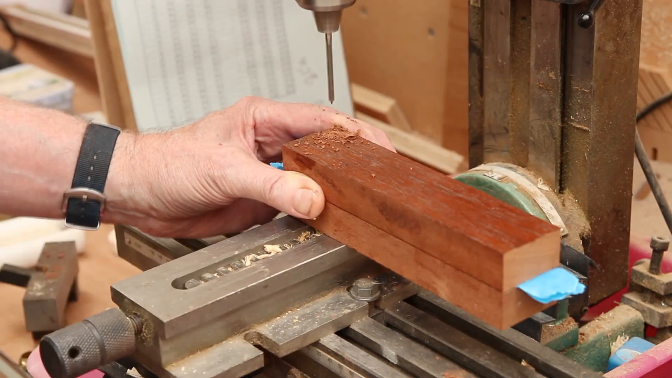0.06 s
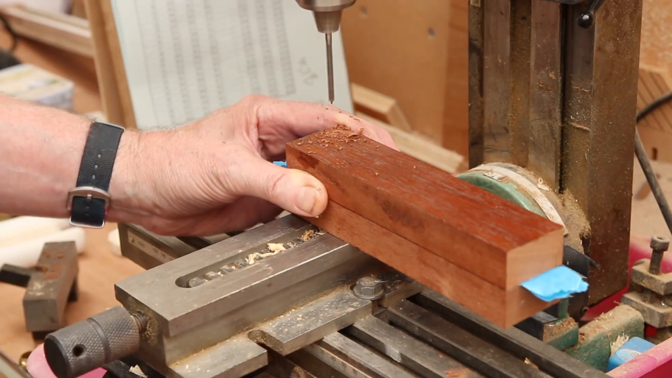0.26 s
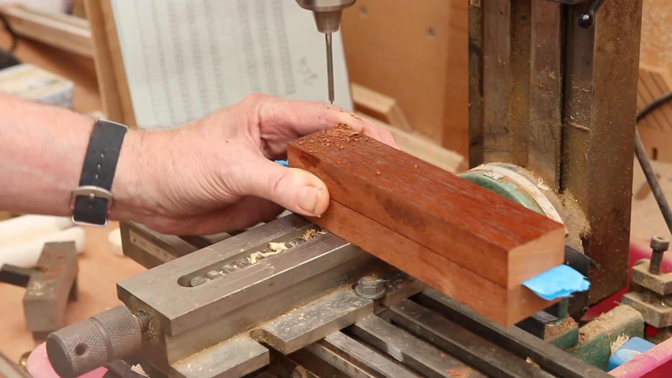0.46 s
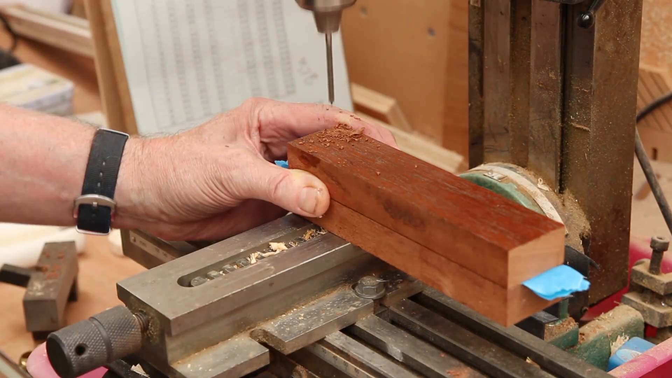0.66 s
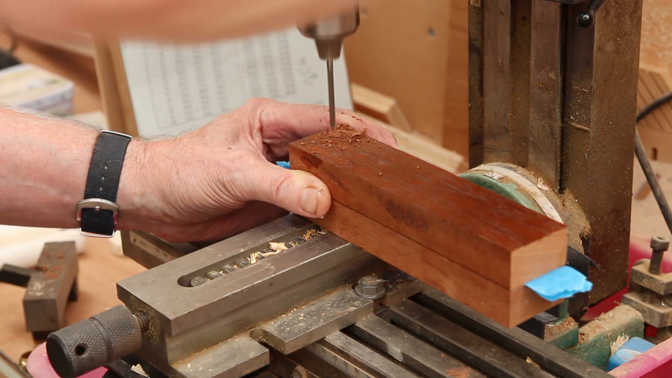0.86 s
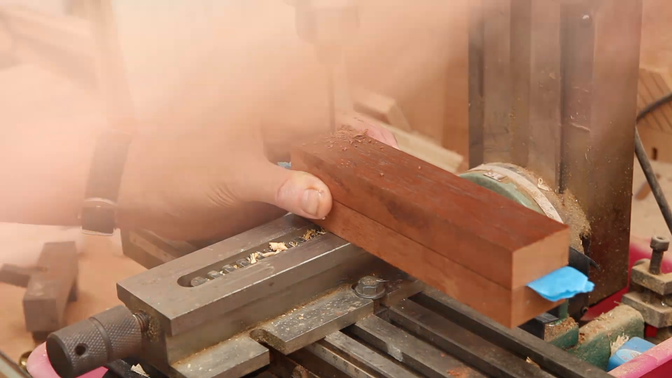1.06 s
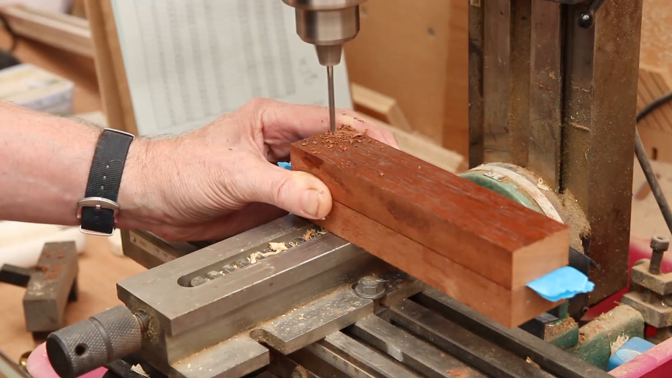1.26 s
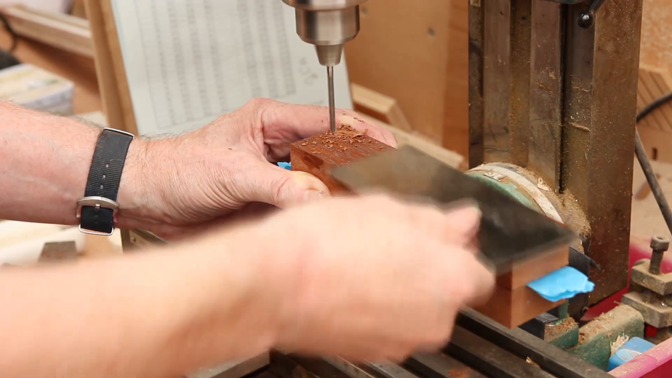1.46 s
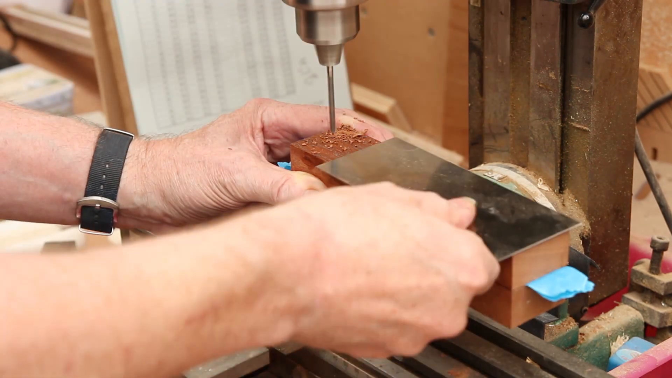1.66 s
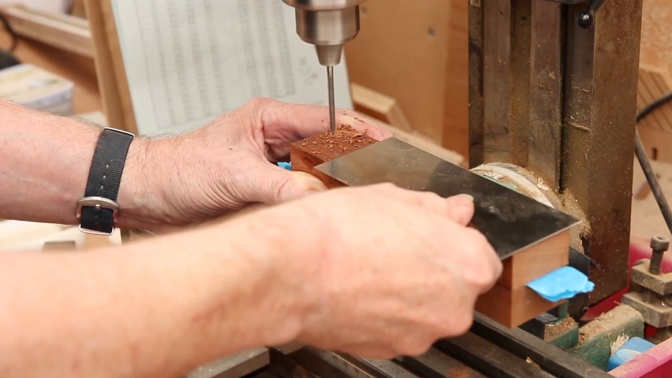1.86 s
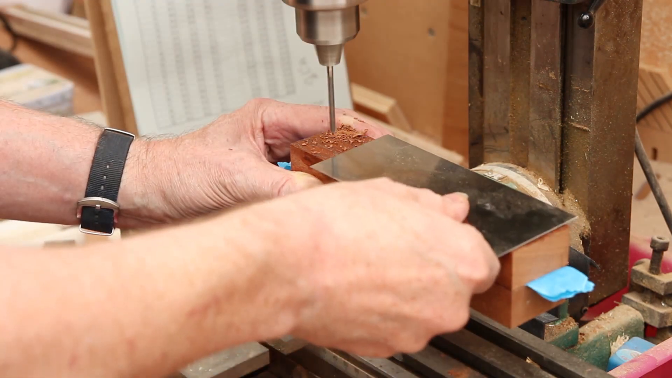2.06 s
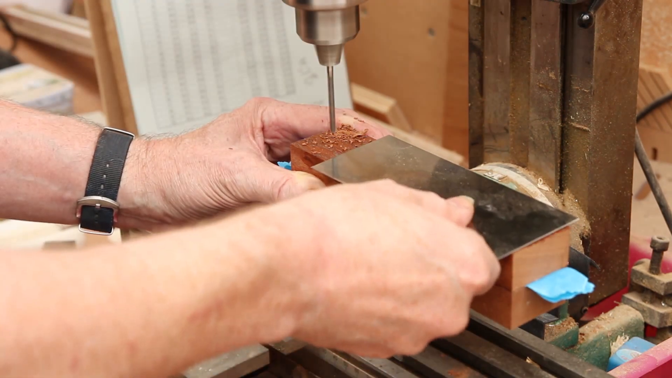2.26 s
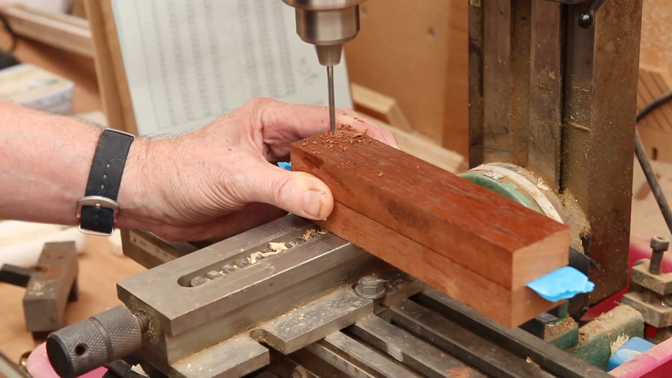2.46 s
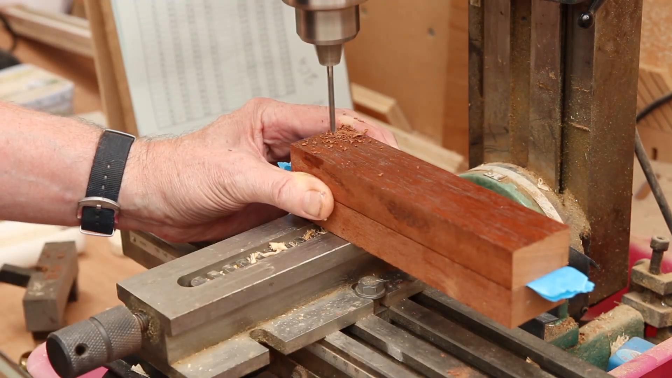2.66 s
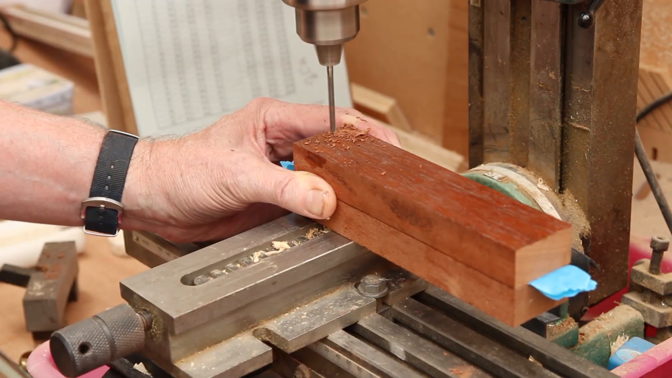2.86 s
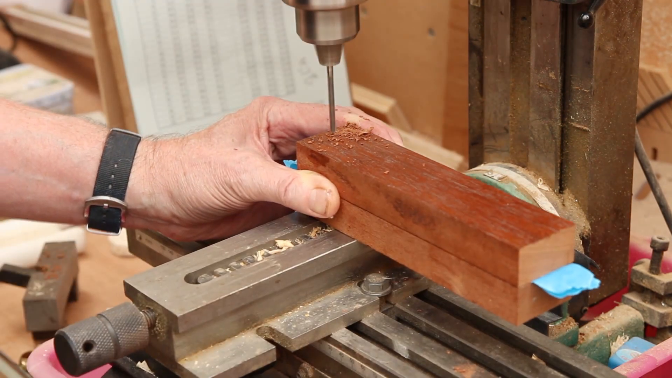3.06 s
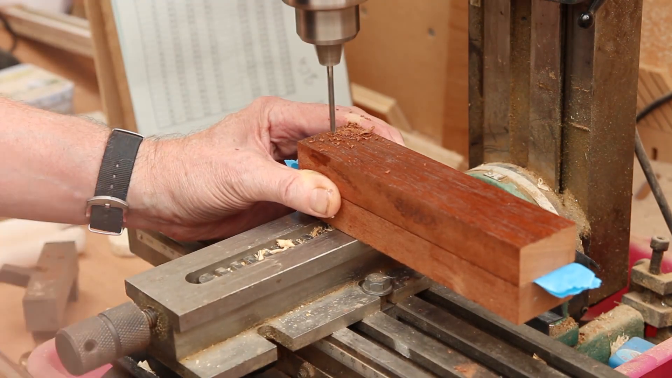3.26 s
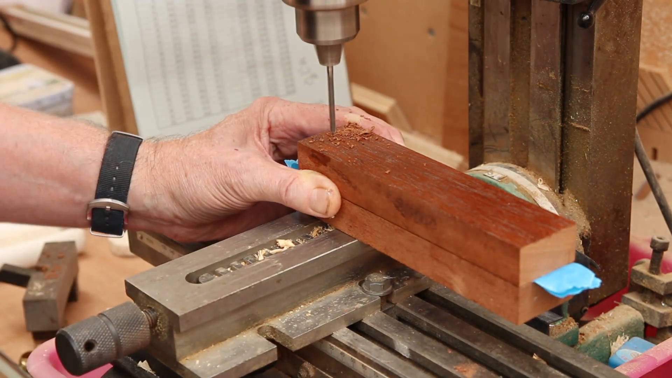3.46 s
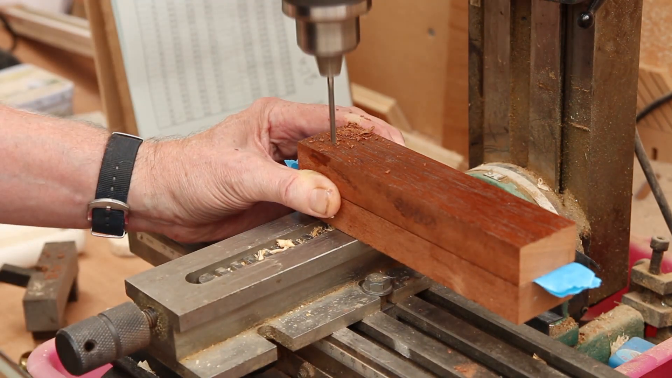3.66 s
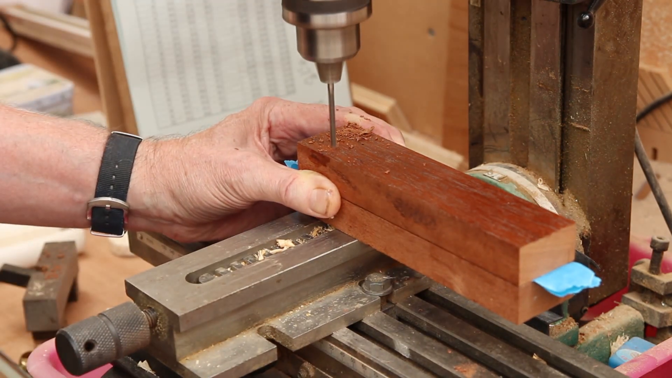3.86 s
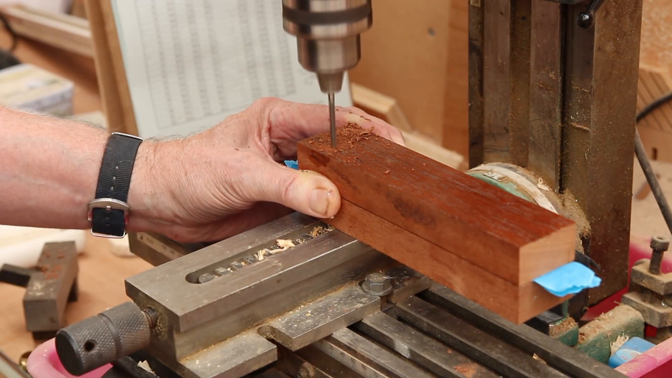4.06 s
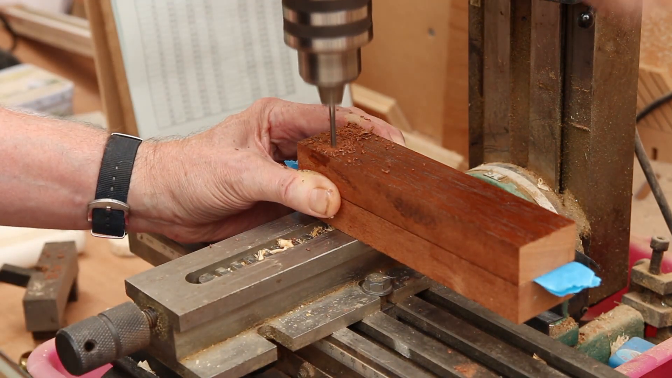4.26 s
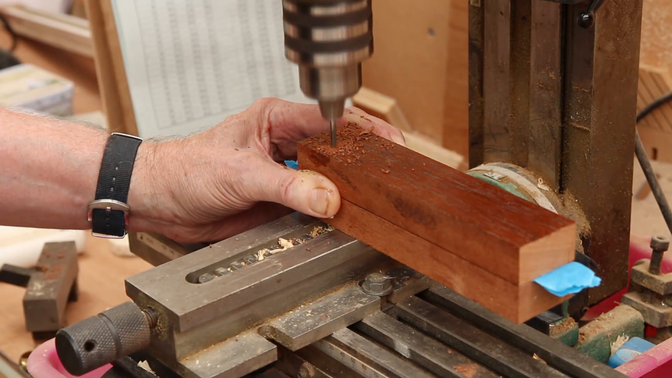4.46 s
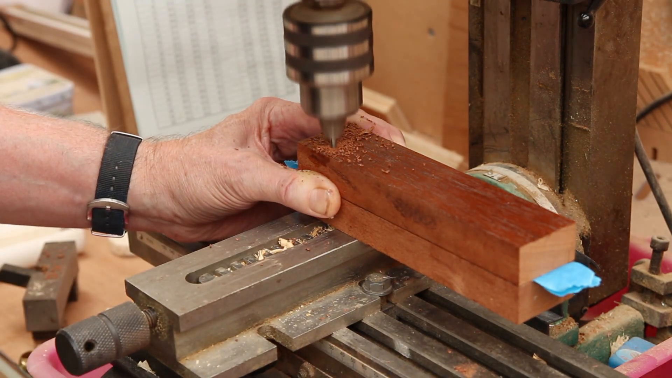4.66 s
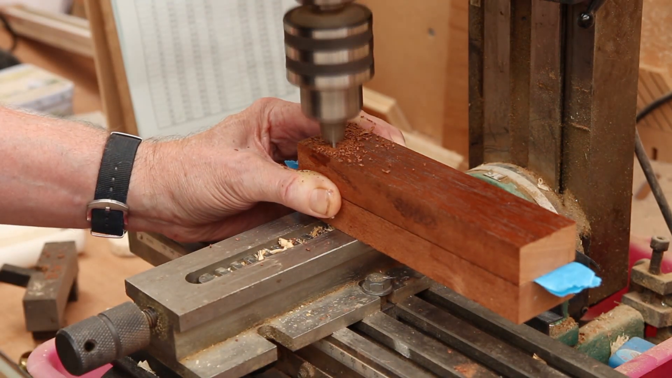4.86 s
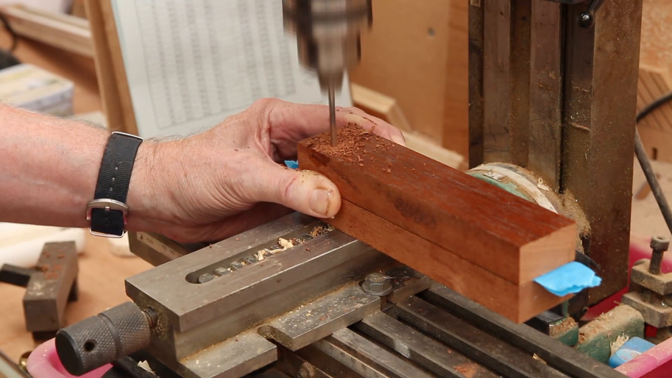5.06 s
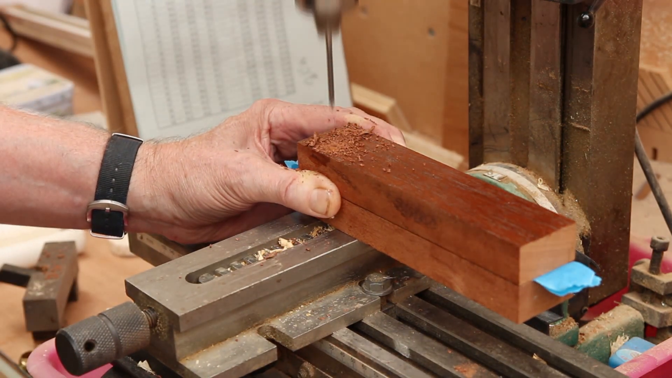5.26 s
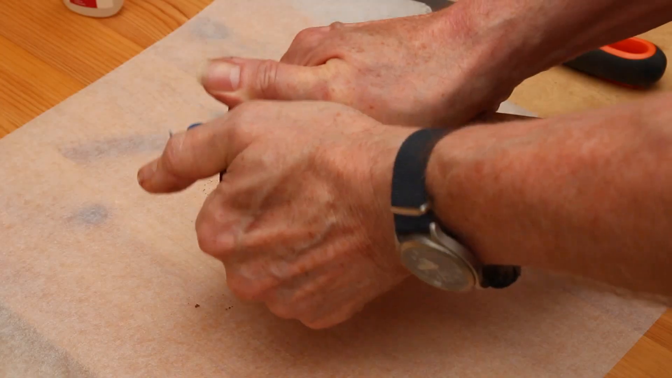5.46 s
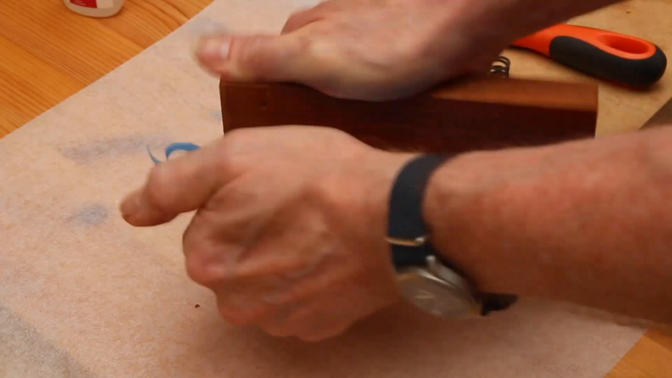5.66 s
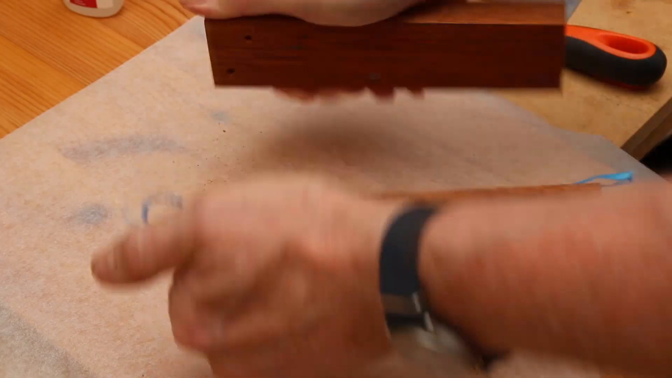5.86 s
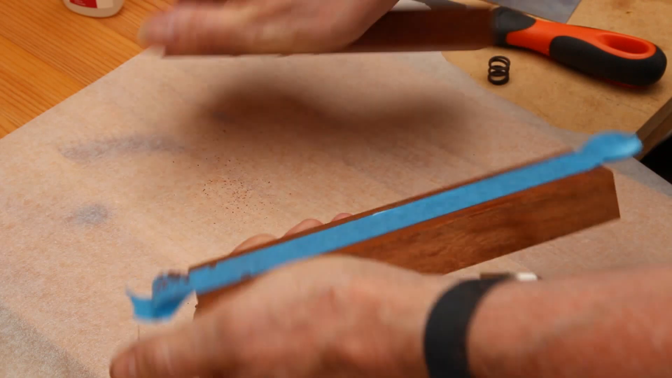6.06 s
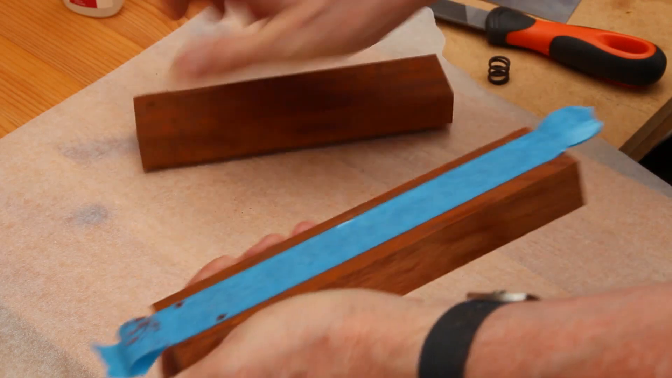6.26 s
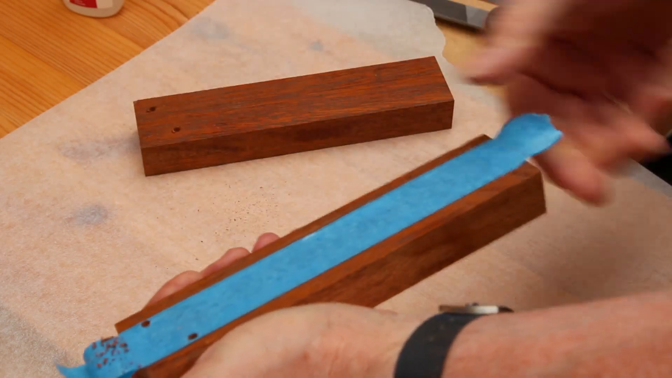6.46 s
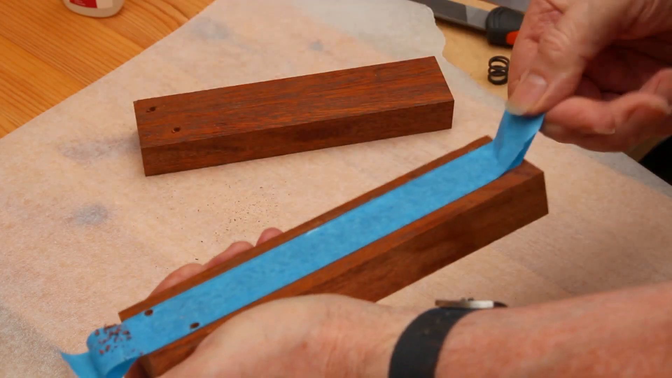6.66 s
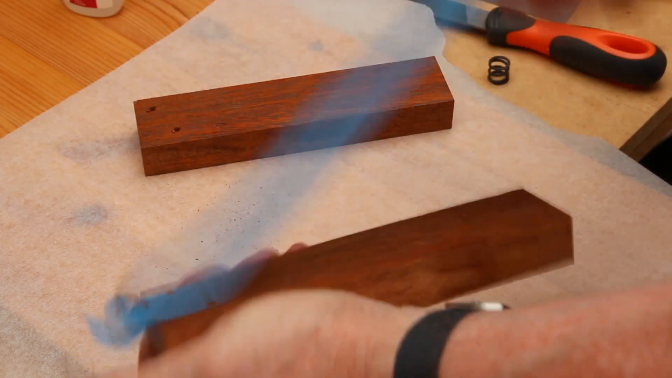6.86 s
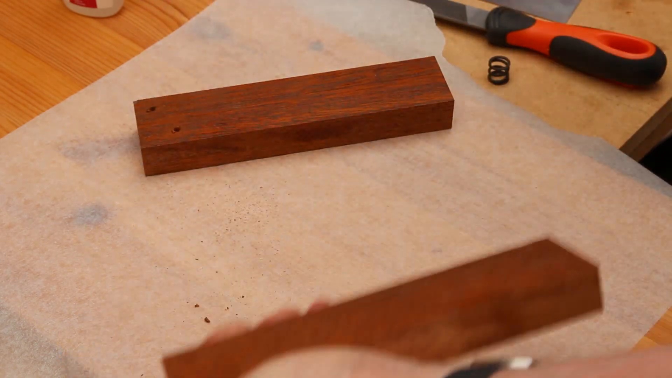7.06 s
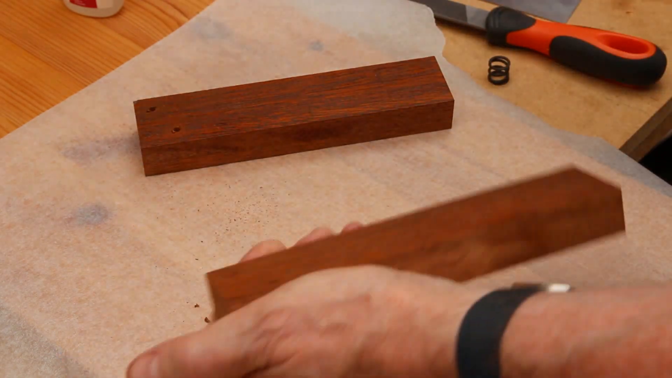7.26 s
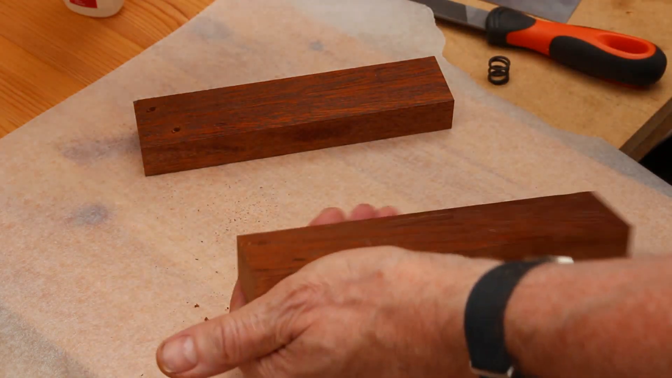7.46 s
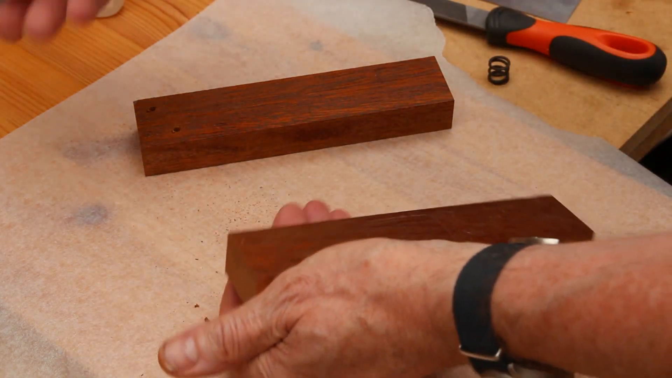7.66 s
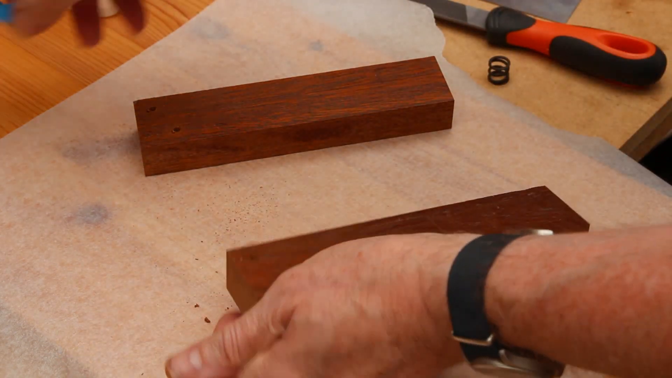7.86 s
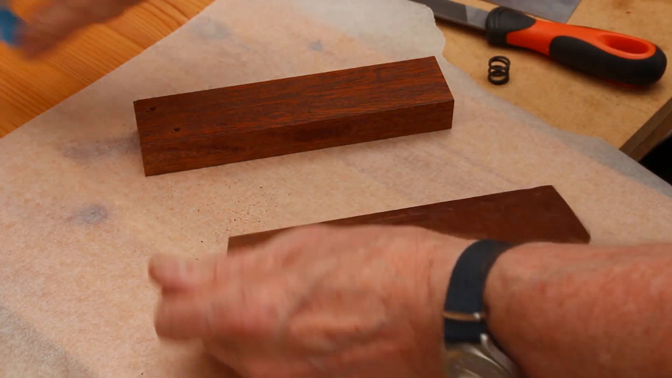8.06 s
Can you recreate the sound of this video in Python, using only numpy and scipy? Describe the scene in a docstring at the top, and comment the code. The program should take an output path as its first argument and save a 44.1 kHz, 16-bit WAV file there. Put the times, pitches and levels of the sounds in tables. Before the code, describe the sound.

A benchtop drill runs from the start, bright, metallic and pulsing, with faint scuffs and one short sagging squeak. Feeding into hardwood chokes its singing whine into denser, grittier rasp and a brief screech. It ends instantly. Then close bench sounds in a quiet, softly echoing room: a dry crack, a wood clatter, a short tape rip, light skin rubs and a dull thud, sitting slightly right in stereo.

```python
"""A small drill press chatters and whines as its bit is fed into hardwood: pulsing friction noise rings steel modes
over rasp, frame noise and hum. A steel scraper squeaks on the wood (sagging sine), among brief scuffs (narrow noise).
The drilling ends abruptly and the workbench is heard: two taped blocks snap apart (decaying noise), one is set
down with a clatter (struck modes), the tape is ripped off and the other block is turned in the hand (grainy noise)
in a quiet workshop with diffuse echoes."""
import sys
import numpy as np
from scipy import signal
from scipy.fft import rfft, irfft
from scipy.io import wavfile

SR = 44100
rng = np.random.default_rng(int(sys.argv[2]) if len(sys.argv) > 2 else 0)


def dump(signal):
    """Clip the signal to [-1, 1] and save it as 16-bit WAV at the path in sys.argv[1]."""
    limited = np.clip(np.atleast_2d(signal).T, -1, 1)
    pcm = np.round(limited * 32767).astype(np.int16)
    wavfile.write(sys.argv[1], SR, pcm)


N = 357210
TIME = np.arange(N) / SR
FREQS = np.fft.rfftfreq(N, 1 / SR)


def from_db(db):
    """Decibels to amplitude gain."""
    return 10 ** (np.asarray(db) / 20)


def rms_one(x):
    """Scale to unit power."""
    return x / np.sqrt(np.mean(x ** 2) + 1e-20)


def at_hz(points, hz):
    """Interpolate (frequency [Hz], value) points on a log-frequency axis."""
    points_hz, values = np.array(points).T[:2]
    return np.interp(np.log(np.maximum(hz, 1)), np.log(points_hz), values)


def drift(rate_hz):
    """Low-passed noise with spread 1: slow random wandering."""
    spectrum = rfft(rng.standard_normal(N))
    return rms_one(irfft(spectrum / (1 + (FREQS / rate_hz) ** 2), N))


def hump(s, length_s):
    """Gaussian of height 1 centred on s, down to exp(-2) at length_s either side."""
    return np.exp(-2 * ((TIME - s) / length_s) ** 2)


def colour(x, spectrum):
    """Minimum-phase filter of unit mean power, shaped by (frequency [Hz], relative level [dB])."""
    gain = rms_one(from_db(at_hz(spectrum, FREQS)))
    cepstrum = irfft(np.log(gain), N)
    # fold the cepstrum to make the filter causal
    cepstrum[1:N // 2] *= 2
    cepstrum[N // 2 + 1:] = 0
    return irfft(rfft(x) * np.exp(rfft(cepstrum)), N)


def stereo_noise():
    """White noise common to both ears plus a weaker side part of opposite sign in each."""
    # side signal: (frequency [Hz], level [dB])
    side_width = [(50, -11), (300, -14), (1000, -11), (3000, -13), (6000, -9), (14000, -10)]
    side = irfft(rfft(rng.standard_normal(N)) * from_db(at_hz(side_width, FREQS)), N)
    return rng.standard_normal(N) + side * [[1], [-1]]


def pan(x, right_db):
    """Raise the right channel over the left by right_db."""
    return x * from_db(np.array([[-.5], [.5]]) * right_db)


def resonate(x, hz, width_hz):
    """Two-pole resonance with peak gain 1."""
    r = np.exp(-np.pi * width_hz / SR)
    zeros = np.array([1, 0, -1]) * (1 - r * r) / 2
    poles = [1, -2 * r * np.cos(2 * np.pi * hz / SR), r * r]
    return signal.lfilter(zeros, poles, x)


def narrow(x, hz, width_hz):
    """Twice through one resonance, at unit power."""
    once = resonate(x, hz, width_hz)
    return rms_one(resonate(once, hz, width_hz))


def drill():
    """Grainy friction, pulsing with the chatter, rings the spindle and the bit over a humming motor."""
    # bit touches the wood, idles in the hole, is fed in deep, drawn back: (time [s], load on the bit [0-1])
    load_curve = [(.68, .2), (.9, .62), (1.2, .27), (2.8, .12), (3.45, .25), (4.0, .95), (4.7, .9),
                  (5.0, .5), (5.36, .55)]
    # spindle and chuck resonances:
    # (frequency [Hz], width [Hz], relative level running light [dB], relative level at full load [dB])
    whine_modes = [(2473, 19.6, -10, -6.5), (2814, 32, -5, -8), (2888, 7.4, 7, -17), (2950, 8.1, -19, 3),
                   (3016, 42, -9.5, -4), (3147, 21, -1.5, -0.5), (3209, 44, -9.5, 1.5), (3370, 24, -20, -3)]
    # bit and steel fittings:
    # (frequency [Hz], width [Hz], relative level running light [dB], relative level at full load [dB])
    steel_modes = [(5480, 68, -3.5, -8), (6043, 53, -2, -5), (6820, 72, 1.5, 5.5), (7080, 37, -8, 1),
                   (7820, 15, -17, 9.5), (9295, 290, -8.5, -3.5), (9535, 103, -4.5, 5),
                   (13470, 230, -1, 1.5), (14300, 610, -20, -6)]
    # cutting noise: (frequency [Hz], relative level [dB])
    rasp_colour = [(900, -39), (1500, -24), (2200, -7), (3400, 0.5), (3850, 3), (4600, 0.5), (5200, 5.5),
                   (6400, 3), (8800, 5), (10200, 1.5), (11200, 7.5), (12700, 1.5), (15700, 0.5)]
    let_up_s, let_up_length_s = 4.95, 0.08

    load = np.interp(TIME, *np.transpose(load_curve))
    # handle let up: frame and rasp grow quieter
    let_up = np.clip((TIME - let_up_s) / let_up_length_s, 0, 1)

    # the wood damps the whine, quickens and blurs the chatter
    whine_gain_db = -26.5 - 7.0 * load
    rasp_gain_db = -25.5 - 1.7 * load - 0.5 * let_up
    chatter_depth = 0.6 - 0.18 * load
    kicks = chatter(beats_hz=84.2 + 12 * load + 1.2 * drift(8))

    t, swell_s = TIME[:SR // 50], 0.0021
    swell = (t / swell_s) ** 2 * np.exp(-2 * t / swell_s)
    swells = rms_one(signal.oaconvolve(kicks, swell)[:N])
    pulse = np.sqrt(1 - chatter_depth + chatter_depth * swells ** 2)
    friction = rms_one(stereo_noise() * pulse * from_db(-0.5 * drift(490)))

    # each beat knocks a quickly damped chuck resonance, which stiffens under load
    knock = 0
    for share, hz in [(1 - load, 3020), (load, 3200)]:
        knock = knock + share * signal.oaconvolve(kicks, swell * np.sin(2 * np.pi * hz * t))[:N]
    whine = rms_one(steel(friction, whine_modes, load)) + from_db(3.0) * chatter_depth * rms_one(knock)
    whine = rms_one(whine) * from_db(whine_gain_db)

    # the cutting edges add a broad gritty rasp under the ring of the steel
    grit = rms_one(stereo_noise() * pulse * from_db(-0.5 * drift(860)))
    rasp = rms_one(bounce(colour(grit, rasp_colour)))
    rasp = rasp + from_db(14.5) * steel(friction, steel_modes, load)

    frame = (frame_rumble(load) + motor_hum()) * from_db(-2 * let_up)
    spindle = whine + screeches(friction) + spindle_tones(load) * pulse
    return pan(spindle, 2.3) + pan(rasp * from_db(rasp_gain_db), 3.4) + pan(frame, 2.5)


def chatter(beats_hz, jitter_s=.0005, uneven_db=3.5):
    """The spindle rattles about once a beat, uneven in time and strength."""
    beats = np.flatnonzero(np.diff(np.floor(np.cumsum(beats_hz) / SR)))
    late, strength = rng.standard_normal((2, len(beats)))
    at = beats + (late * jitter_s * SR).astype(int)
    kicks = np.zeros(N)
    kicks[np.clip(at, 0, N - 1)] = from_db(uneven_db * np.clip(strength, -2, 1))
    return kicks


def steel(drive, modes, load):
    """Steel resonances whose balance shifts as the bit is loaded."""
    out = 0
    for hz, width_hz, light_db, loaded_db in modes:
        out = out + resonate(drive, hz, width_hz) * from_db(light_db + load * (loaded_db - light_db))
    return out


def screeches(friction):
    """The spindle screeches at the bottom of the hole, then again lower as it lifts: friction in a narrow band."""
    # (time [s], level [dB], frequency [Hz], length [s])
    screech_table = [(4.742, -29, 3197, 0.2), (4.976, -33, 2940, 0.12)]
    out = 0
    for s, db, hz, length_s in screech_table:
        out = out + from_db(db) * narrow(friction, hz, width_hz=250) * hump(s, length_s)
    return out


def spindle_tones(load):
    """The spindle sings in close, wavering sines that the wood chokes as the bit bites."""
    # (frequency [Hz], relative level [dB])
    tone_table = [(2783, -36.5), (2864, -40), (2939, -47), (3025, -45), (3149, -41)]
    turning_s = np.cumsum(1 + 0.001504 * drift(8.9)) / SR
    tones = 0
    for hz, db in tone_table:
        tones = tones + np.sqrt(2) * from_db(db + 1.5 * drift(6)) * np.sin(2 * np.pi * hz * turning_s)
    return tones * from_db(0.5 - 12.0 * load ** 2)


def bounce(x, gain_db=-4.0, t60_s=.05):
    """Column, table and vice throw the sound back within a few milliseconds and ripple its spectrum."""
    t = TIME[:SR // 50]
    paths = rng.standard_normal(len(t)) * from_db(-60 * t / t60_s) * (t > .001)
    paths = rms_one(paths)[None] / np.sqrt(len(t))
    return x + from_db(gain_db) * signal.oaconvolve(x, paths, axes=1)[:, :N]


def frame_rumble(load):
    """The machine frame adds coloured noise that grows with load."""
    # (frequency [Hz], relative level [dB])
    body_colour = [(30, -43), (90, -7.5), (250, -4), (350, 14), (390, 14), (470, -0.5), (630, -3), (680, 6),
                   (800, -6), (1300, -4.5), (2000, 0.5), (4000, -48)]
    return colour(stereo_noise(), body_colour) * from_db(-52.5 + 6.5 * load)


def motor_hum():
    """The motor hums in sines, each wandering in level and pitch."""
    # (frequency [Hz], relative level [dB])
    hum_tones = [(86, -76.5), (193, -70.5), (300, -54), (599, -66), (1798, -54.5)]
    hum = 0
    for hz, db in hum_tones:
        turning_s = np.cumsum(1 + 0.00263 * drift(6.5)) / SR
        hum = hum + np.sqrt(2) * from_db(db + 1.05 * drift(1.9)) * np.sin(2 * np.pi * hz * turning_s)
    return hum


def squeak():
    """The scraper sticks and slips once on the wood: a rough sine, sagging in pitch."""
    squeak_s, length_s, level_db = 2.076, .028, -21.5
    pitch_hz, sag_hz_per_s = 1267, 500
    hz = pitch_hz - sag_hz_per_s * np.clip(TIME - squeak_s, -2 * length_s, 2 * length_s)
    tone = np.sqrt(2) * np.sin(2 * np.pi * np.cumsum(hz * (1 + 0.014 * drift(120))) / SR)
    return tone * from_db(level_db + 2.0 * drift(110)) * hump(squeak_s, length_s)


def brief_noises():
    """Scuffs, dull after-sounds and faint ringing: humps of band-passed noise."""
    # scuffs, the snap's dull after-sound at 5.665 s, a thud's low rumble at 7.785 s:
    # (time [s], level [dB], centre frequency [Hz])
    burst_table = [(.438, -43.5, 1160), (.759, -42.5, 284), (.948, -29, 3270), (.962, -38.5, 1320),
                   (1.867, -42, 1450), (2.098, -41.5, 820), (2.196, -45, 383), (2.581, -43, 1520),
                   (5.665, -31.5, 1250), (7.785, -37, 161)]
    # faint narrow-band ringing: the wooden block near 2.7 kHz, the tape's fading ring at 1200 Hz:
    # (time [s], level [dB], frequency [Hz], length [s])
    ringing_table = [(5.794, -51, 2650, 0.043), (6.43, -40.5, 2670, .18), (7.157, -56, 1200, 0.22),
                     (7.78, -52.5, 2820, 0.11), (8.005, -49, 2780, 0.084)]
    noise, out = rng.standard_normal(N), np.zeros(N)
    for s, db, hz in burst_table:
        out += from_db(db) * narrow(noise, hz, width_hz=0.65 * hz) * hump(s, length_s=0.034)
    for s, db, hz, length_s in ringing_table:
        out += from_db(db) * narrow(noise, hz, width_hz=180) * hump(s, length_s)
    return out


def squeak_and_brief_noises():
    """The scraper's squeak and the brief noises, leaning right together."""
    return pan(squeak() + brief_noises(), 2.9)


def snap(spectrum, gain_db=-6.0, t60_s=0.034):
    """The taped blocks give way, then crack apart 7 ms later: two decaying bursts of coloured noise."""
    snap_s, snap_db = 5.611, 2.5
    give_s, give_db = snap_s - 0.007, -14.0
    force = 0
    for s, db in [(give_s, give_db), (snap_s, snap_db)]:
        force = force + from_db(db - 60 * np.maximum(TIME - s, 0) / t60_s) * (TIME >= s)
    return pan(from_db(gain_db) * colour(stereo_noise() * force, spectrum), 2.8)


def knocks(tick_db=20.0):
    """Each contact thuds the bench and clacks the block with a brief hard tick; soft contacts lose their treble."""
    # wood on the bench: (time [s], bench thud [dB], block clack [dB], low-pass of the clack [Hz])
    contacts = [(6.2487, 3, -25.5, 7000), (6.2825, -0.5, -12.5, 1190), (6.3125, -26, -11.5, 6240),
                (6.3865, -46, -20, 2200), (6.676, -52, -53, 7000), (6.790, -49, -40.5, 7000),
                (7.402, -34, -50, 6900), (7.624, -60, -53, 10000), (7.748, -13.5, -45, 1510)]
    # bench: (frequency [Hz], relative level [dB], T60 [s])
    bench_modes = [(145, -29.5, 0.12), (314, -10, 0.039), (470, -6.5, 0.061), (631, -12, 0.071),
                   (698, -10.5, 0.029), (895, -20, 0.043)]
    # wooden block: (frequency [Hz], relative level [dB], T60 [s])
    block_modes = [(835, -13, 0.064), (1070, -14, .035), (1580, -11, 0.019), (2243, -11, 0.039),
                   (2646, -3, 0.066), (2910, -15, 0.082), (3600, -17, .02)]
    crack_colour = [(100, -8), (800, 7), (2500, 8.0), (5300, 4.0), (8000, -7.0), (16000, -9)]
    crack_db, crack_t60_s, tick_t60_s = 8.0, 0.039, 0.0079
    rebound_s, rebound_db = .0085, -12
    thud_rise_s = 0.0016

    out, t = np.zeros((2, N)), TIME[:SR // 4]
    crack_noise = colour(stereo_noise(), crack_colour)
    high_pass = signal.butter(2, 12000, "high", fs=SR, output="sos")
    tick_noise = signal.sosfilt(high_pass, stereo_noise())
    crack_decay = from_db(crack_db - 60 * t / crack_t60_s)
    tick_decay = from_db(tick_db - 60 * t / tick_t60_s)
    for k, (s, thud_db, clack_db, bright_hz) in enumerate(contacts):
        own = slice(k * len(t), (k + 1) * len(t))   # fresh noise for each contact
        clack = ring(block_modes, t) + crack_decay * crack_noise[:, own] + tick_decay * tick_noise[:, own]
        # the block rocks back onto its other edge
        clack = clack + from_db(rebound_db) * ring(block_modes, np.maximum(t - rebound_s, 0))
        clack = signal.sosfilt(signal.butter(2, bright_hz, fs=SR, output="sos"), clack)
        thud = ring(bench_modes, t) * (1 - np.exp(-t / thud_rise_s))
        add(out, s, from_db(thud_db) * thud + from_db(clack_db) * clack)
    return pan(out, 1.9)


def ring(modes, t):
    """Struck modes decay as sines of alternating sign, their levels a little different at every blow."""
    out = 0
    for k, (hz, db, t60_s) in enumerate(modes):
        decay = from_db(db + rng.normal(0, 1) - 60 * t / t60_s)
        out = out + decay * np.sin(2 * np.pi * hz * t) * (-1) ** k
    return out


def add(out, s, sound):
    """Mix a sound in at time s."""
    at = round(s * SR)
    out[..., at:at + sound.shape[-1]] += sound[..., :N - at]


def tape():
    """One pull rips the tape off in countless tiny releases."""
    # (frequency [Hz], relative level [dB])
    tape_colour = [(59, -29), (100, -9), (170, -23), (223, -12), (379, -3.5), (864, -8.5), (1350, -0.5),
                   (1630, -5.5), (5100, 0.5), (9420, -7), (15600, -14)]
    return stick_slip(peel_force(), tape_colour, grain_db=2.0, grain_hz=500)


def peel_force():
    """The pull on the tape: a sudden snatch, a steady fade, a jerk as the end comes free."""
    peel_s, length_s, attack_s, release_s = 6.867, 0.112, 0.0033, 0.026
    start_db, fade_db_per_s = -22.0, 81
    snatch_db, snatch_length_s = 0.5, 0.01
    jerk_db, jerk_length_s = 9.5, .011
    t = TIME - peel_s
    gate = np.clip(t / attack_s, 0, 1) * np.exp(-np.maximum(t - length_s, 0) / release_s)
    snatch = hump(peel_s + snatch_length_s / 2, snatch_length_s)
    jerk = hump(peel_s + length_s - jerk_length_s / 2, jerk_length_s)
    fade_db = start_db - fade_db_per_s * np.clip(t, 0, length_s)
    return gate * from_db(fade_db + snatch_db * snatch + jerk_db * jerk)


def fingers():
    """Skin slides over the wood in soft, grainy rubs."""
    # (time [s], level [dB], length [s])
    rubs = [(5.59, -50.5, 0.062), (6.68, -48.5, 0.03), (7.33, -55.5, 0.3), (7.631, -44, 0.055),
            (7.74, -44.5, 0.12), (7.99, -46, 0.1), (8.09, -45.5, 0.033)]
    # (frequency [Hz], relative level [dB])
    rub_colour = [(290, -37.5), (500, -3), (1030, -13), (1310, -9.5), (2780, -8.5), (3030, -10), (5960, -7),
                  (6690, -11), (15600, -24.5)]
    force = sum(from_db(db) * hump(s, length_s) for s, db, length_s in rubs)
    return stick_slip(force, rub_colour, grain_db=3.5, grain_hz=120)


def stick_slip(force, spectrum, grain_db, grain_hz):
    """Countless tiny releases, bunched into grains: coloured noise with a wandering level."""
    grains = rms_one(stereo_noise() * from_db(grain_db * np.clip(drift(grain_hz), -2, 2)))
    return pan(colour(grains * force, spectrum), 2.4)


def workshop(x, build_s=0.0023):
    """Diffuse echoes build up quickly and decay at a rate set band by band, soonest in the top treble."""
    # (frequency [Hz], T60 [s])
    room_t60 = [(100, 0.95), (500, 0.53), (1500, 0.54), (4000, 0.46), (8000, 0.44), (15000, 0.19)]
    t, edges_hz = TIME[:SR * 3 // 4], np.geomspace(60, 18000, 10)
    noise, tail = stereo_noise()[:, :len(t)], 0
    for low_hz, high_hz in zip(edges_hz, edges_hz[1:]):
        band_pass = signal.butter(2, [low_hz, high_hz], "band", fs=SR, output="sos")
        t60_s = at_hz(room_t60, np.sqrt(low_hz * high_hz))
        tail = tail + signal.sosfilt(band_pass, noise) * from_db(-60 * t / t60_s)
        noise = np.roll(noise, len(t) // 10, axis=1)
    tail = rms_one(tail * (1 - np.exp(-t / build_s))) / np.sqrt(len(t))
    return signal.fftconvolve(x, tail, axes=1)[:, :N]


def workshop_air():
    """The quiet workshop: steady coloured noise."""
    # (frequency [Hz], relative level [dB])
    air_colour = [(15, -45), (25, -15.5), (189, -9), (254, -9.5), (290, -12), (539, -20.5), (1670, -29.5),
                  (2710, -28.5), (3370, -29.5), (7360, -33.5), (8190, -33), (15600, -52)]
    return pan(from_db(-52) * colour(stereo_noise(), air_colour), 1.7)


def scene(echo_count=3):
    """First the drill press, then the bench and its room; brief noises fall in both."""
    # direct crack: (frequency [Hz], relative level [dB])
    snap_colour = [(60, -21), (400, -13.5), (750, -20), (1350, -4), (1900, -3), (2600, 1), (3200, -8),
                   (3950, 9), (4800, 1.5), (5900, 2.5), (7500, -5), (16000, -24)]
    # crack as it spreads into the room: (frequency [Hz], relative level [dB])
    snap_spread = [(300, -10.5), (1300, -7), (1900, -8), (4500, -0.5), (7500, -2), (16000, -17.5)]
    echo_colour = [(100, -3.0), (450, -4.5), (800, 4.0), (2600, 1), (4100, 2.0), (5600, -3.5),
                   (9000, -9), (16000, 1.5)]
    drill_stop_s = 5.379
    drilling = np.clip((drill_stop_s - TIME) / 0.003, 0, 1)
    peel, rub = tape(), fingers()
    # a blow sounds a little different in each direction, so its echoes average to a smooth tail
    echoes = 0
    for _ in range(echo_count):
        sent = from_db(-9.0) * knocks(tick_db=0.0) + from_db(-9.5) * snap(snap_spread)
        sent = sent + from_db(-14.5) * (peel + rub)
        echoes = echoes + workshop(sent)
    echoes = colour(echoes / np.sqrt(echo_count), echo_colour)
    bench = snap(snap_colour) + knocks() + peel + rub + echoes + workshop_air()
    return drill() * drilling + squeak_and_brief_noises() + bench * (1 - drilling)


def record(dry):
    """Peaks beyond full scale clip; a steep low-pass cuts the top."""
    low_pass = signal.ellip(10, .1, 80, 15800, fs=SR, output="sos")   # 0.1 dB ripple, 80 dB stop, 15.8 kHz
    return signal.sosfilt(low_pass, np.clip(dry, -1, 1))


dry = scene()
out = record(dry)
dump(out)
```